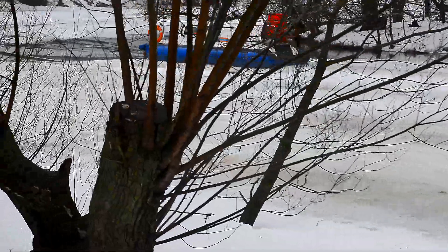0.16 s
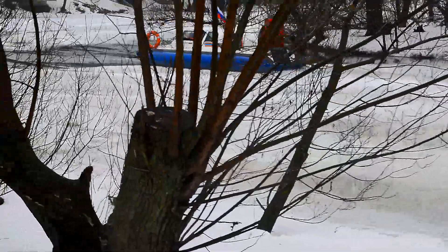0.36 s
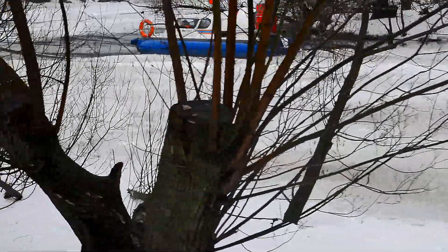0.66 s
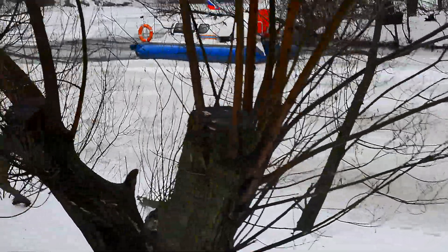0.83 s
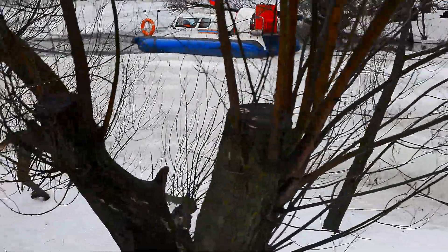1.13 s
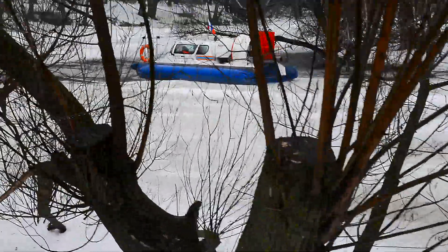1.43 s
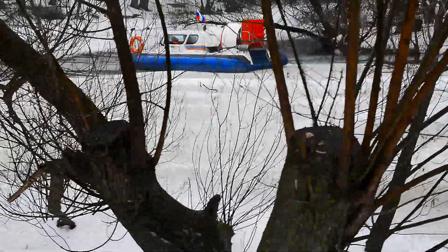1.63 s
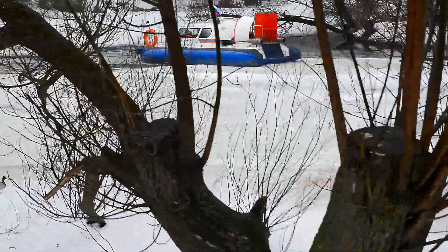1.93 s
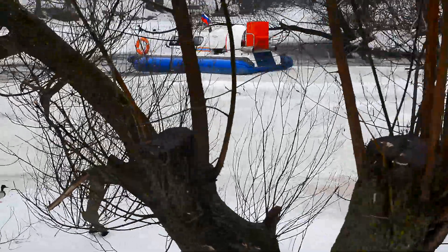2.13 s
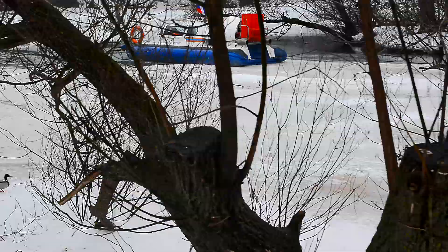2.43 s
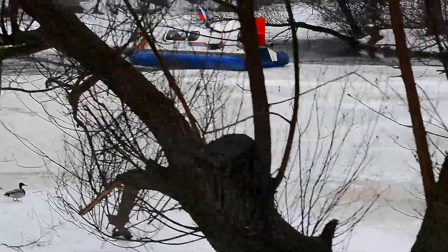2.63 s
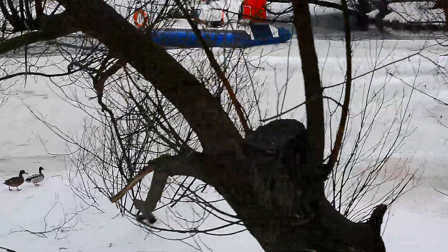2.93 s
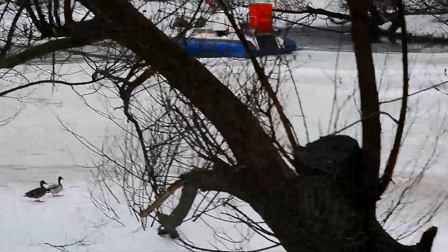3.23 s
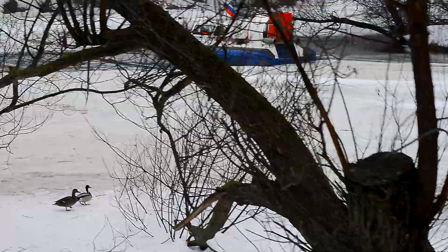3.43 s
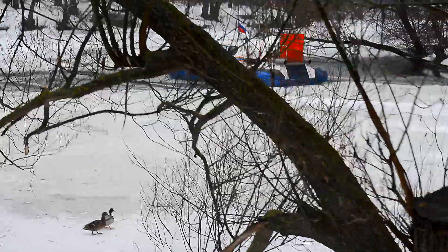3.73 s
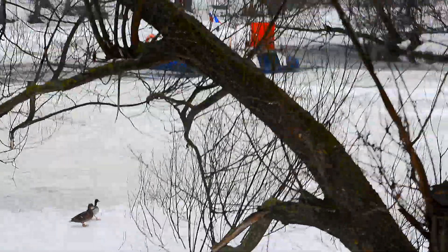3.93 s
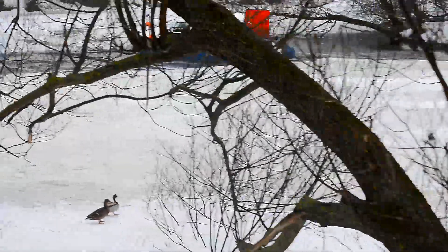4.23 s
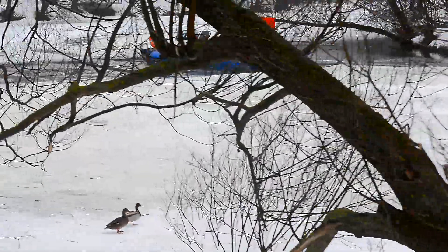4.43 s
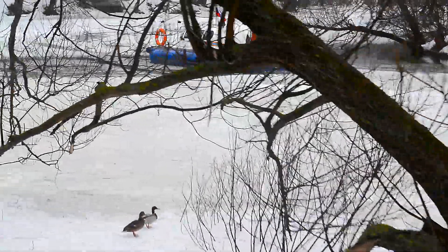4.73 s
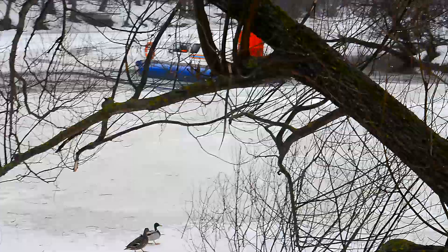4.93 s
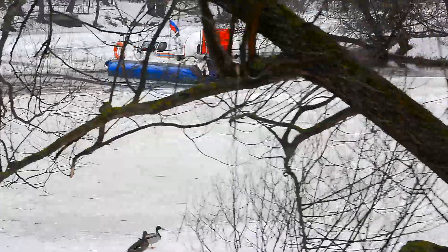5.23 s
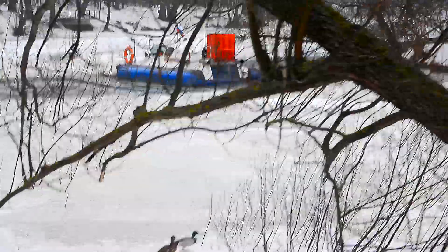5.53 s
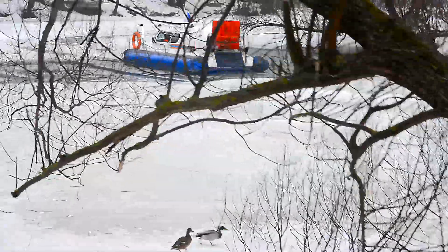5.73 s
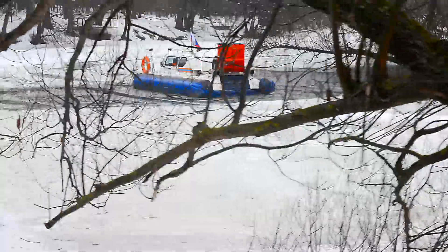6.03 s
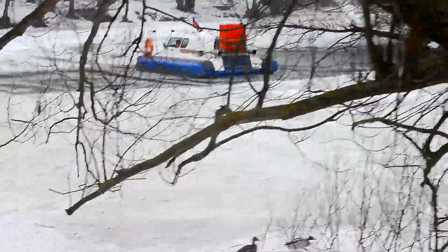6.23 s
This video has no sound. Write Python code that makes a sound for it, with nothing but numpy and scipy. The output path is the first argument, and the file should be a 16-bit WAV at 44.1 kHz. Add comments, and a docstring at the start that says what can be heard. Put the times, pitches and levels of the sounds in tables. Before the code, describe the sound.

A hovercraft drones across a frozen river, its propeller and engine pitch sinking, rising, then sinking again over airy roar, with small clicks near the microphone.

```python
"""Hovercraft on a frozen river

A hovercraft crosses a frozen river, heard from the bank. Its engine and three-blade ducted propeller rev down, up
and down again: two geared harmonic series of sines. Shaped turbulent noise gives rumble, roar, rasp, hiss and a
hollow howl; a flickering sine near 1.5 kHz whistles in short pips. Small clicks close to the microphones are
bursts that excite damped casing modes. Two port responses colour the far sound; steady self-noise lies below all.
"""
import sys
import numpy as np
from scipy import signal
from scipy.fft import rfft, irfft, next_fast_len
from scipy.io import wavfile
from scipy.ndimage import uniform_filter1d, map_coordinates

SR = 44100
rng = np.random.default_rng(int(sys.argv[2]) if len(sys.argv) > 2 else 0)


def to_wav(sig):
    """Store sig (one row per channel, or 1-D mono) as 16-bit WAV at the path in sys.argv[1].

    Samples outside -1..1 are clipped; the rate is SR.
    """
    pcm = np.clip(np.atleast_2d(sig), -1, 1) * 32767
    pcm = np.round(pcm).astype(np.int16)
    wavfile.write(sys.argv[1], SR, pcm.T)  # frames by channels


N = 280917
TIME_S = np.arange(N) / SR
ABEAM_S, CRUISE_HZ = 3, 52  # reference time and blade rate for the level slopes
HALVES = np.array([[0.5], [-0.5]])  # splits a left-right difference evenly


def amp(db):
    """Level law: decibels to amplitude gain."""
    return 10 ** (np.asarray(db) / 20)


def unit(x):
    """Normalisation: x scaled to rms 1."""
    return x / np.sqrt(np.mean(x ** 2) + 1e-20)


def along(points, hz, beyond=None):
    """Logarithmic pitch scale: interpolates (Hz, value) points on a log frequency axis."""
    f, v = np.transpose(points)
    return np.interp(np.log(hz + 1), np.log(f + 1), v, beyond, beyond)


def curves(rows):
    """Slow control: one interpolated curve for each column after the time."""
    s, *cols = np.transpose(rows)
    return [np.interp(TIME_S, s, c) for c in cols]


def wobble(rate):
    """Random modulation: a smooth curve through rate random knots a second."""
    steps = np.arange(0, N + 64, 64)
    knots = rng.standard_normal(int(N * rate / SR) + 4)
    return np.interp(np.arange(N), steps, map_coordinates(knots, [steps * rate / SR]))


def filtered(x, response):
    """Linear filtering: the spectrum of x times a response of frequency."""
    m = next_fast_len(N + SR // 2)
    return irfft(rfft(x, m) * response(np.fft.rfftfreq(m, 1 / SR)), m)[..., :N]


def noise(spectrum, channels):
    """Random noise: smooth, shaped, of rms 1, and uncorrelated between channels."""
    white = rng.standard_normal((channels, N))
    return unit(filtered(white, lambda hz: amp(along(spectrum, hz, -120))))


def speeding(hz):
    """Acceleration as load: smoothed change of the blade rate in Hz/s."""
    return uniform_filter1d(np.gradient(hz) * SR, size=SR // 3)


# Course of the drive. Each row: time in seconds, blade rate in Hz, swell of the blade tones in dB,
# base level of the roar in dB.
DRIVE_COURSE = [(0, 55.3, -4, -34), (0.49, 51.03, -3, -37), (0.98, 47.74, -4, -38.5), (1.4, 46.26, -2, -40),
                (1.71, 45.13, 2, -42), (1.96, 45.73, 2, -39.5), (2.3, 49.28, 3, -40),
                (2.69, 53.32, 2.5, -38.5), (3.18, 56.66, 1.5, -35.5), (3.6, 58.94, 0.5, -34.5),
                (3.95, 60.27, -1, -35), (4.3, 59.75, -0.5, -34.5), (4.65, 57.82, 3, -33),
                (5.14, 54.63, 2.5, -35.5), (5.5, 51.77, 1.5, -36), (5.88, 48.4, -4, -36.5),
                (6.37, 42.88, -6.5, -40)]


def drive_course():
    """Common source: the blade rate, swell and roar level that steer the far sounds."""
    return curves(DRIVE_COURSE)


def tone(turns, db, waver_db, drift):
    """Scattering by moving air: a sine near rms db, its level and phase (drift in radians) randomly shaken."""
    phase = 2 * np.pi * turns + drift * wobble(14)
    return np.sqrt(2) * amp(db + waver_db * wobble(9)) * np.sin(phase)


# Strong tones against speed. Each row: blade rate in Hz, then base levels in dB rms of blade tones 1 to 4
# and of firing tones 1 and 2.
STRONG_TONES = [(44.5, -57, -32, -34.5, -49, -44.5, -36), (46.46, -58, -30, -32, -37.5, -41, -36.5),
                (52.75, -49.5, -35.5, -30.5, -27, -41.5, -39.5),
                (55.1, -46.5, -40, -33.5, -26.5, -40.5, -41.5),
                (59.4, -38.5, -43, -28.5, -27, -49.5, -35.5)]
# Share of the swell that each strong tone takes. One column: a plain factor.
SWELL_SHARE = [0.65, 0.83, 1.3, .9, .1, 0.057]
# Change of each strong tone as the craft shows more of its stern. One column: slope in dB per second.
TURN_SLOPE = [-0.67, 1.94, 0.18, -0.9, 1.05, 0.015]
# Gain of each strong tone under load. One column: gain in dB per Hz/s of speeding up.
LOAD_GAIN = [.45, -0.14, 0.038, 0.07, -0.062, -0.13]
# Weak upper blade tones. Each row: multiple of the blade rate, base level in dB above the roar.
WEAK_BLADE_TONES = [(5, -9), (6, -10), (7, -7), (8, -14.5), (10, -16), (12, -16)]
# Weak upper firing tones. Each row: multiple of the firing rate, base level in dB rms at cruise rate.
WEAK_FIRING_TONES = [(3, -46), (4, -54)]
FIRINGS_PER_BLADE = 2.595  # firings for each blade passage
FIRING_DB_PER_HZ = -0.31  # weak firing tones sink as the blade rate rises


def drive():
    """Periodic forces: harmonics of blade passage and geared firings; unequal blades beat at the shaft rate."""
    hz, swell_db, roar_db = drive_course()
    hz = uniform_filter1d(hz, size=SR // 4)  # the heavy rotor changes speed smoothly
    blades = np.cumsum(hz) / SR  # blade passages so far
    firings = FIRINGS_PER_BLADE * blades
    past = TIME_S - ABEAM_S
    rates, *levels = np.transpose(STRONG_TONES)
    db = [np.interp(hz, rates, level) + share * swell_db + turn * past + load * speeding(hz)
          for level, share, turn, load in zip(levels, SWELL_SHARE, TURN_SLOPE, LOAD_GAIN)]

    strong = sum(tone(k * blades, d, 0.9, 0.04 * k) for k, d in zip((1, 2, 3, 4), db))
    strong += tone(firings, db[-2], 2.6, 0.27)
    strong += tone(2 * firings, db[-1], 1.16, 0.47)

    weak = sum(tone(k * blades, roar_db + d, 2.95, 0.085 * k) for k, d in WEAK_BLADE_TONES)
    firing_slope_db = FIRING_DB_PER_HZ * (hz - CRUISE_HZ)
    weak += sum(tone(k * firings, d + firing_slope_db, 3.9, 0.14 * k) for k, d in WEAK_FIRING_TONES)

    shaft = 2 * np.pi * blades / 3
    unequal = 1 + 0.085 * np.cos(shaft) + 0.085 * np.cos(2 * shaft + 1.5)
    return strong * unequal + weak, blades


# Left-right likeness of the air noise. Each row: frequency in Hz, correlation as a plain factor.
LIKENESS = [(60, 1), (300, 0.99), (640, 1), (1410, 0.65), (3100, 0.27), (6820, 0.14), (15000, 0.088)]


def rush(spectrum, patchy_db):
    """Partial coherence: patchy stereo noise from mid and side parts, scaled to a mid part of rms 1."""
    z = signal.stft(rng.standard_normal((2, N)), nperseg=512)[2]
    field = rng.standard_normal(z.shape[1:])
    field = uniform_filter1d(uniform_filter1d(field, size=5, axis=0), size=10, axis=1)
    pair = signal.istft(z * amp(patchy_db * unit(field)), nperseg=512)[1][:, :N]

    def mid_side(hz):
        angle = np.arccos(np.clip(along(LIKENESS, hz), -1, 1)) / 2
        return amp(along(spectrum, hz, -120)) * [np.cos(angle), np.sin(angle)]

    mid, side = filtered(pair, mid_side)
    return np.array([mid + side, mid - side]) / np.sqrt(np.mean(mid ** 2))


# Level laws of rumble, then rasp. Each row: level in dB at cruise rate when abeam, slope in dB per Hz of
# blade rate, share of the roar's swing, slope in dB per second, gain in dB per Hz/s of speeding up.
AIR_LEVELS = [(-33, 0.34, .05, .5, -0.06), (-43.5, 0.31, 0.13, -0.01, 0)]
# Base level of the hiss. Each row: time in seconds, level in dB.
HISS_LEVEL = [(0, -50), (0.7, -52.5), (1.5, -52.5), (2.6, -50.5), (3.4, -49.5), (4.1, -51), (6.37, -51.6)]
# Spectra of the four air noises. Each row: frequency in Hz, relative density in dB per Hz.
RUMBLE_SPECTRUM = [(15, -55.5), (45, -16.5), (80, 4), (170, 6), (300, 2.5), (450, -14.5), (700, -42)]
# Roar, each row: frequency in Hz, relative density in dB per Hz.
ROAR_SPECTRUM = [(180, -13), (300, -2.5), (420, -6.5), (600, -6.5), (800, -10), (1000, -32), (1400, -46)]
# Rasp, each row: frequency in Hz, relative density in dB per Hz.
RASP_SPECTRUM = [(600, -13.5), (900, 3), (1100, 0.5), (1500, 1), (1800, -4), (2100, -17.5), (3000, -43)]
# Hiss, each row: frequency in Hz, relative density in dB per Hz.
HISS_SPECTRUM = [(1200, -10.5), (1900, -2), (2430, -2.5), (3600, -8.5), (4200, -9), (6000, -15.5),
                 (11000, -29.5)]


def air(blades):
    """Turbulence: broadband noise from skirt, duct and exhaust; blade passages puff the roar and rasp."""
    hz, _, roar_db = drive_course()
    past = TIME_S - ABEAM_S
    roar_swing = roar_db - roar_db.mean()
    hiss_db, = curves(HISS_LEVEL)
    rumble_db, rasp_db = [
        db + slope * (hz - CRUISE_HZ) + share * roar_swing + turn * past + load * speeding(hz)
        for db, slope, share, turn, load in AIR_LEVELS]
    puff = 1 + 0.068 * np.cos(2 * np.pi * blades)
    rumble = amp(rumble_db + 0.4 * wobble(6)) * rush(RUMBLE_SPECTRUM, patchy_db=1.0)
    roar = amp(roar_db + 0.23 * wobble(17)) * puff * rush(ROAR_SPECTRUM, patchy_db=0.5)
    rasp = amp(rasp_db + 0.29 * wobble(12)) * puff * rush(RASP_SPECTRUM, patchy_db=1.0)
    hiss = amp(hiss_db + 0.27 * wobble(20)) * rush(HISS_SPECTRUM, patchy_db=0.73)
    return rumble + roar + rasp + hiss


# Spectrum of a hollow band of the roar. Each row: frequency in Hz, relative density in dB per Hz.
HOWL_SPECTRUM = [(900, -42), (1040, -3), (1130, 2), (1350, -44)]


def howl():
    """Band-limited noise: a hollow band that grows with blade rate and is strongest at the right port."""
    hz = drive_course()[0]
    level_db = -51.5 + 0.93 * (hz - CRUISE_HZ) + 3.3 * wobble(5.6)
    return amp(level_db) * noise(HOWL_SPECTRUM, channels=1) * [[0.25], [1]]


# Whistle pips. Each row: approximate time of the peak in seconds, height of the peak in dB.
WHISTLE_PIPS = [(0.0637, -42), (0.1555, -36), (0.237, -40), (0.3074, -43), (0.4394, -46), (0.5055, -36.5),
                (0.5317, -39), (0.6524, -44), (1.1812, -45), (1.5439, -37), (1.661, -38.5), (2.2887, -36),
                (2.3705, -40), (2.4792, -37.5), (2.5284, -37)]
PIP_HZ = 1500
FLICKER_DB, FLICKER_DB_PER_S = -53, -1.6  # the weak whistle between pips fades as the craft passes


def whistle():
    """Amplitude modulation: short swells of one phase-shaken sine, over a weaker flicker of the same."""
    swell = amp(FLICKER_DB + FLICKER_DB_PER_S * TIME_S + 2.7 * wobble(35))
    for s, db in WHISTLE_PIPS:
        rise_s = 0.0062 * amp(rng.normal(0, 0.89))
        u = TIME_S[:SR // 8] / rise_s
        swell[round((s - 0.004) * SR):][:len(u)] += amp(db) * u * np.exp(1 - u)
    return swell * np.sin(2 * np.pi * PIP_HZ * TIME_S + 2.7 * wobble(40))


# Clicks close to the microphones. Each row: start in seconds, level in dB, left minus right in dB,
# decay of the crack to -60 dB in seconds, gain of the knock in dB, gain of the edge in dB.
CLICK_EVENTS = [(3.8187, -37.5, -11, .003, -60, -26), (4.181, -24.5, 6.5, .001, -36, -7),
                (4.7799, -32.5, -1, 0.0039, -57, -24), (4.894, -17.5, 1, 0.0043, -37, -13),
                (5.009, -29.5, -9, 0.0023, -55, -23), (5.0118, -33.5, -8, .002, -62, -25),
                (5.5305, -27, -3, 0.0022, -56.5, -14), (5.727, -18.5, -6, 0.00052, -39, -0.5),
                (5.776, -15, 0.5, 0.012, -27.5, -8.5)]
# Casing modes, one list beside the left port and one beside the right.
# Each row: frequency in Hz, gain in dB, decay to -60 dB in seconds.
SHELL_MODES = [
    [(6630, 4, 0.0014), (5340, -8.5, 0.002)],
    [(4540, 2, 0.005), (5680, -5, 0.0023)],
]
# Deep casing modes. Each row: frequency in Hz, gain in dB, decay to -60 dB in seconds.
BODY_MODES = [(1484, 2, 0.036), (1840, 4.5, 0.01), (2900, -3, 0.0067)]
EDGE_SIDES_DB = np.array([[0], [-10]])  # the edge is weaker at the right port


def clicks():
    """Impulse response: an edge with a short crackle rings the casing at each port and knocks its deep modes."""
    out = np.zeros((2, N + SR))
    t = np.arange(SR // 20) / SR

    def ring(modes):
        return sum(amp(db - 60 * t / t60) * np.sin(2 * np.pi * hz * t) for hz, db, t60 in modes)

    # the two sides flex in opposite directions
    shell = np.array([ring(modes) for modes in SHELL_MODES]) * [[1], [-1]]
    for s, db, pan_db, length, knock_db, edge_db in CLICK_EVENTS:
        crack = amp(-60 * t / length) * rng.standard_normal(len(t))
        crack[0] = 8  # the sharp edge
        crack /= np.linalg.norm(crack)
        edge = crack - np.roll(crack, shift=3)  # the difference takes out the bass
        ringing = signal.fftconvolve(crack[None], shell, axes=1)[:, :len(t)]
        bright = ringing + amp(edge_db + EDGE_SIDES_DB) * edge
        knock = amp(knock_db) * ring(BODY_MODES)
        out[:, round(s * SR):][:, :len(t)] += amp(db + pan_db * HALVES) * bright + knock
    return out[:, :N]


# Shading of far sound before the resonances. Each row: frequency in Hz, left minus right in dB,
# phase lead of the left in radians.
SIDE_SHADING = [(60, -2, -0.18), (111, 0.64, -0.039), (230, 0.8, -0.2), (400, -1.5, -0.43),
                (910, -3.5, -0.48), (1230, -4, 0.24), (2420, 0.5, 0.64), (8120, 0.5, 0.2)]
# Resonances, one list for the left microphone port and one for the right.
# Each row: frequency in Hz, width in Hz, gain in dB.
PORT_RESONANCES = [
    [(5400, 410, -7), (6460, 800, -23)],
    [(4000, 230, -7.5), (4430, 260, -2.5), (5020, 260, -2.5)],
]


def ports(hz):
    """Diffraction and resonance: left-right shading and lag of far sound, times each port's resonant response."""
    f, db, lead = np.transpose(SIDE_SHADING)
    level = amp(HALVES * along(np.c_[f, db], hz))
    lag = np.exp(1j * HALVES * along(np.c_[f, lead], hz))
    resonant = [1 + sum(amp(g) * 1j * hz * w / (c * c - hz * hz + 1j * hz * w) for c, w, g in port)
                for port in PORT_RESONANCES]
    return level * lag * resonant


def scene():
    """Superposition: the far craft passes through the ports; the clicks arise beside them."""
    tones, blades = drive()
    far = tones + whistle() + air(blades) + howl()
    return filtered(far, ports) + clicks()


# Spectrum of the microphones' own hiss. Each row: frequency in Hz, relative density in dB per Hz.
SELF_NOISE_SPECTRUM = [(1000, -21.5), (5000, -1.5), (9000, -4.5), (13000, -9), (16000, -12.5)]
TOP_HZ = 15750  # band limit


def record(dry):
    """Noise floor and band limit: the microphones add steady hiss; nothing is kept above TOP_HZ."""
    hiss = amp(-62.0) * noise(SELF_NOISE_SPECTRUM, channels=2)
    return filtered(dry + hiss, lambda hz: hz < TOP_HZ)


dry = scene()
out = record(dry)
to_wav(out)
```